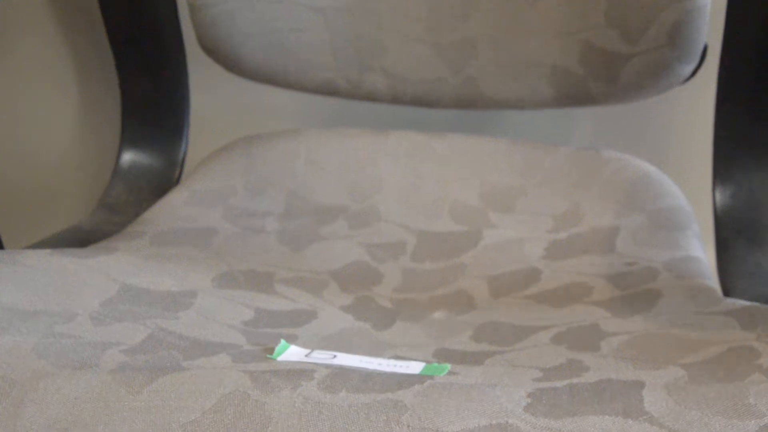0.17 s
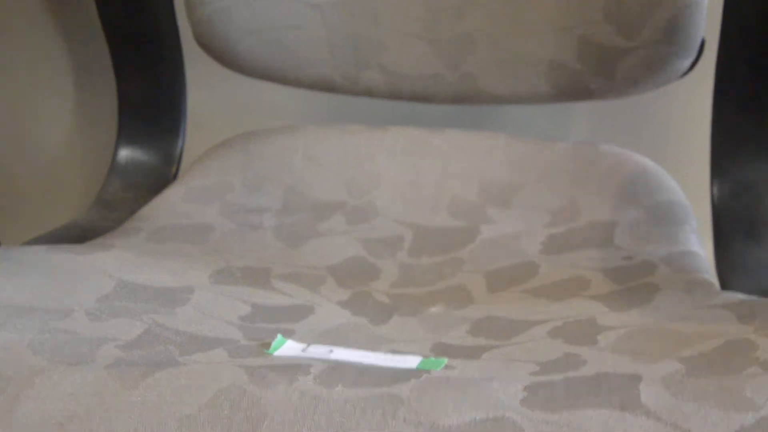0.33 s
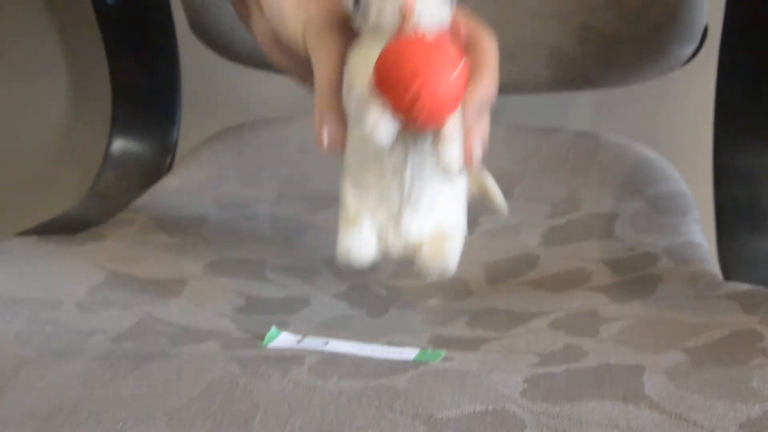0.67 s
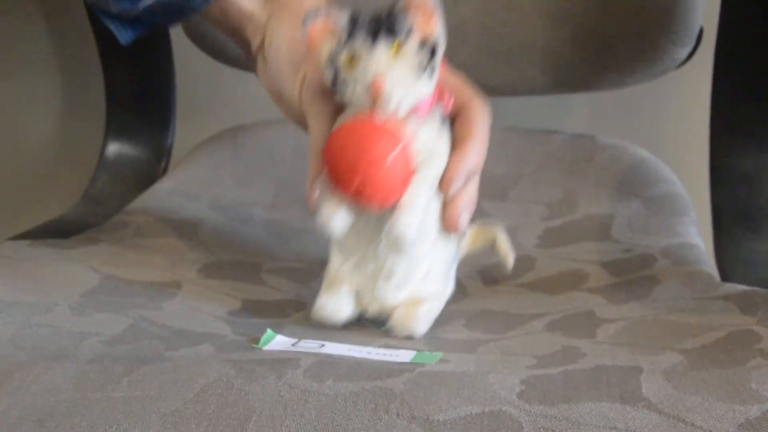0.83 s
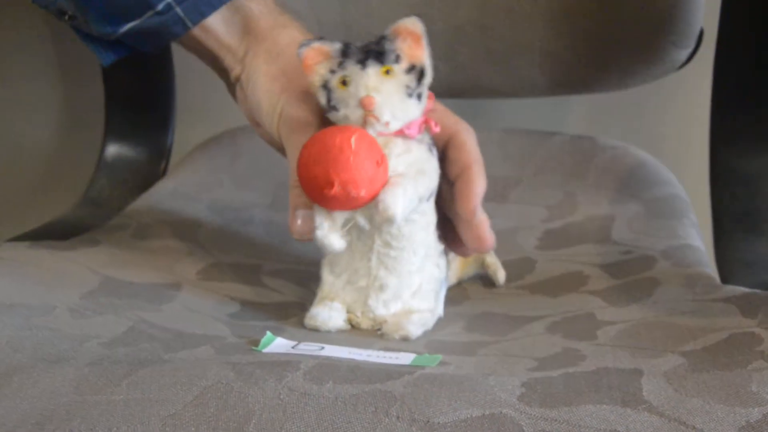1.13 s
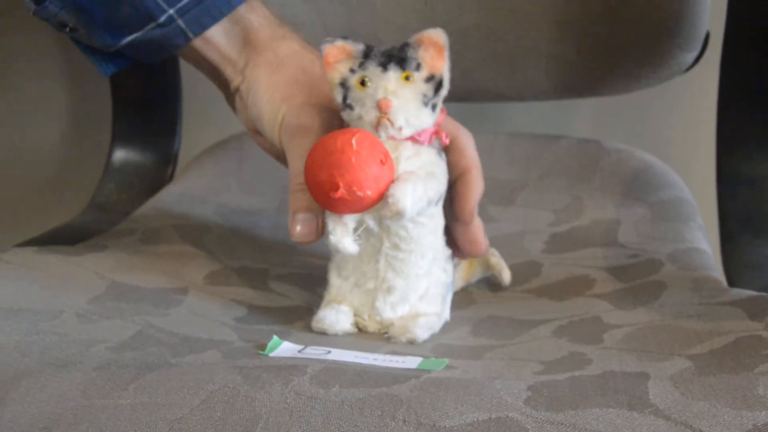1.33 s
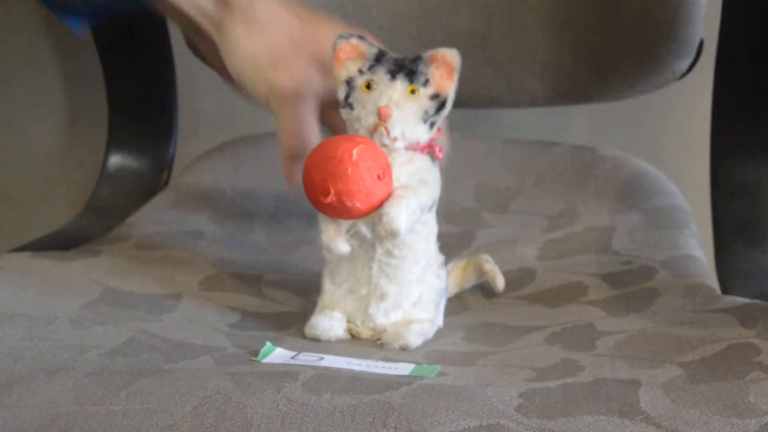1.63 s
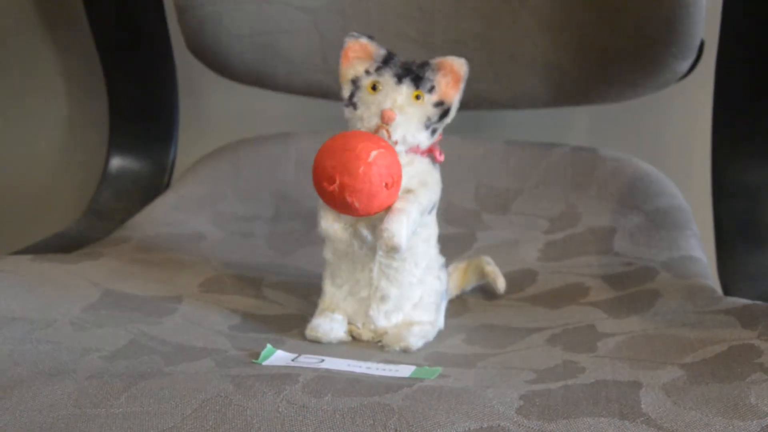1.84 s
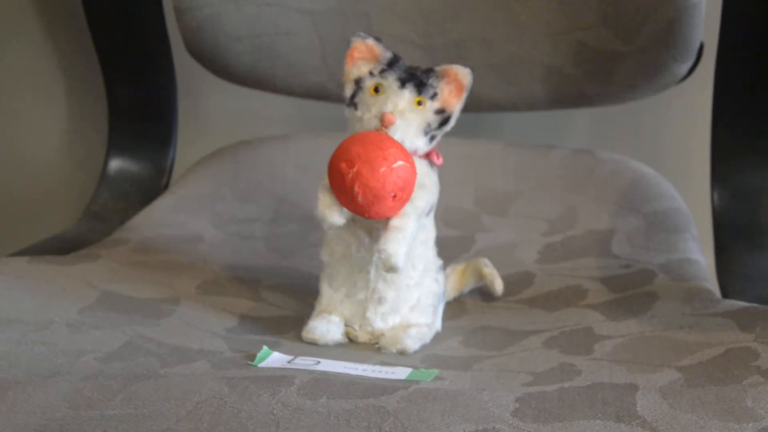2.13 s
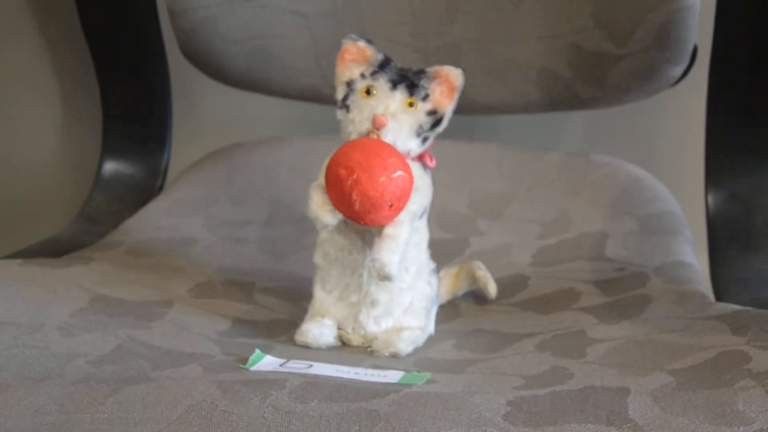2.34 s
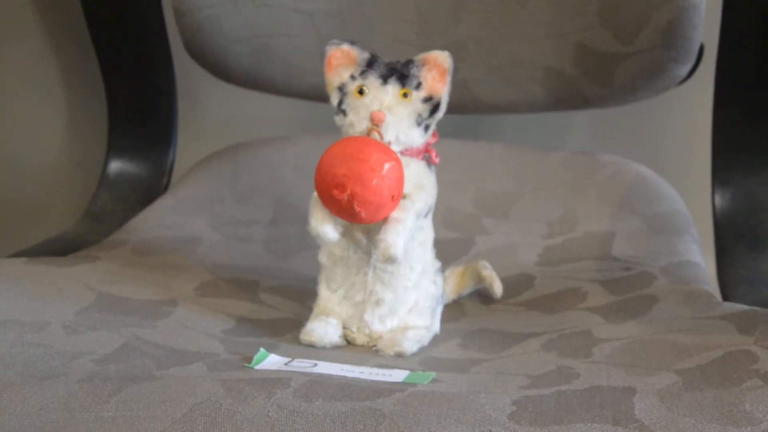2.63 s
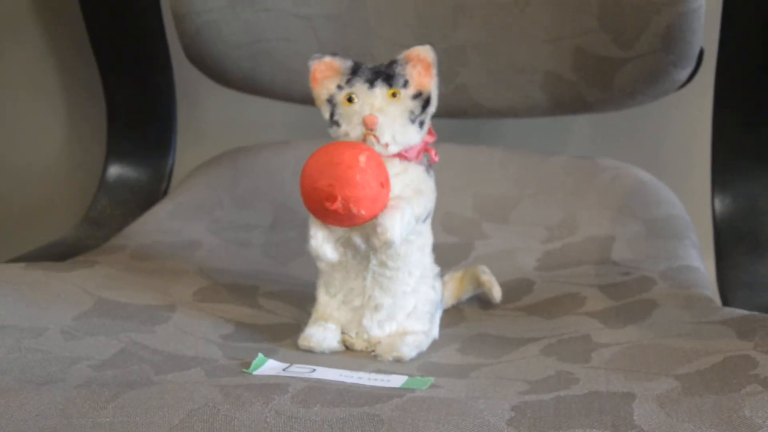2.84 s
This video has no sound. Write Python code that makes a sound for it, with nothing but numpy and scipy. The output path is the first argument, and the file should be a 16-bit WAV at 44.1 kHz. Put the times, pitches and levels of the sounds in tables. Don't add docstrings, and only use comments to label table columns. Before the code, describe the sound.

A wind-up clockwork toy whirs and chatters steadily, with a small bump, in a quiet room.

```python
import sys
import numpy as np
from scipy import signal
from scipy.fft import rfft, irfft, next_fast_len
from scipy.io import wavfile
from scipy.ndimage import uniform_filter1d, map_coordinates

SR = 44100
rng = np.random.default_rng(int(sys.argv[2]) if len(sys.argv) > 2 else 0)


def materialize(psi):
    bounded = np.clip(np.atleast_2d(psi).T, -1, 1)
    quanta = np.round(bounded * 32767).astype(np.int16)
    wavfile.write(sys.argv[1], SR, quanta)


def ratio_of_db(decibels):
    return 10 ** (np.asarray(decibels, float) / 20)


N = 131859
TIME = np.arange(N) / SR

# f/Hz, width/Hz, level/dB
FRAME_TONES = [(1964, 425, -7), (2713, 780, -6.5)]
TIN_TONES = [(3530, 242, 4), (3864, 186, 2)]
UPPER_TIN_TONES = [(4347, 250, 3), (4776, 385, -0.5), (5282, 254, 0)]
PLATE_TONES = [(6050, 640, -8.5), (6500, 580, -5), (7390, 590, -7.5), (8280, 510, -9), (9020, 460, -9.5),
               (10240, 1650, -17.5), (12140, 1240, -24)]


def unit(x):
    return x / np.sqrt(np.mean(x ** 2) + 1e-20)


def wobble(rate):
    points = rng.standard_normal(int(N * rate / SR) + 4)
    return map_coordinates(points, [np.arange(N) * rate / SR])


def filtered(x, response):
    m = next_fast_len(N + SR // 2)
    return irfft(rfft(x, m) * response(np.fft.rfftfreq(m, 1 / SR)), m)[:N]


def ring(x, tones):
    def response(f):
        total = 0
        for k, (center, width, db) in enumerate(tones):
            tone = 1j * f * width / (center ** 2 - f ** 2 + 1j * f * width)
            total = total + (-1) ** k * ratio_of_db(db) * tone
        return total
    return filtered(x, response)


def ticks(per_s, scatter_db):
    chance, size, side = rng.random(N), rng.uniform(-1.3, 1, N), rng.choice([-1, 1], N)
    return (chance < per_s / SR) * side * ratio_of_db(scatter_db * size)


def shaft():
    # t/s, turns done
    turn_times = [(0.0737, 5), (0.0887, 6), (0.1487, 10), (0.2059, 14), (0.2684, 18), (0.3282, 22),
                  (0.3947, 26), (0.4703, 30), (0.5543, 34), (0.6386, 38), (0.7199, 42), (0.8033, 46),
                  (0.8796, 50), (0.9496, 54), (1.0244, 58), (1.0907, 62), (1.1531, 66), (1.2177, 70),
                  (1.2782, 74), (1.339, 78), (1.4072, 82), (1.4753, 86), (1.5389, 90), (1.6056, 94),
                  (1.6819, 98), (1.7591, 102), (1.8464, 106), (1.9558, 110), (2.0362, 114), (2.1158, 118),
                  (2.1908, 122), (2.2576, 126), (2.3164, 130), (2.3748, 134), (2.4325, 138), (2.4873, 142),
                  (2.5447, 146), (2.6063, 150), (2.6715, 154), (2.7386, 158), (2.8065, 162), (2.8708, 166),
                  (2.9335, 170), (2.998, 174)]
    steady = np.interp(TIME, *np.transpose(turn_times))
    speed = np.maximum(np.gradient(steady) * SR, 40)
    return steady + 0.028 * wobble(60), speed


def jolts(turns, level_db):
    # t/s, peak level/dB
    hard_knocks = [(0.2175, -24), (0.3116, -16), (0.4495, -29), (0.5214, -33), (0.531, -17), (0.551, -24),
                   (0.5736, -26), (0.6162, -21), (0.6558, -18), (0.695, -25.5), (0.7164, -32), (0.736, -29),
                   (0.7585, -29), (0.838, -35), (0.856, -28), (0.9853, -23), (1.02, -26), (1.0401, -15),
                   (1.0866, -18), (1.1055, -29), (1.1509, -29), (1.2136, -17), (1.307, -20), (1.3543, -21),
                   (1.456, -21), (1.473, -28), (1.605, -36), (1.6215, -16), (1.737, -17), (1.7766, -18.5),
                   (1.844, -32), (1.8935, -20), (1.9199, -12), (1.9925, -28), (2.0361, -14), (2.075, -22),
                   (2.0945, -27), (2.115, -36), (2.1901, -32), (2.204, -22), (2.284, -24), (2.3148, -27),
                   (2.4585, -26), (2.5892, -35), (2.6186, -30), (2.7038, -20), (2.7219, -21), (2.803, -33),
                   (2.9, -17), (2.9475, -14.5)]
    shake_db, second_share, second_at_turns = 7, 0.45, 0.51
    before_turns, after_turns = 0.15, 0.12
    rise_s, decay_s = 0.00044, 0.0011

    def bump(at):
        away = (turns - at + .5) % 1 - .5
        width = np.where((turns - at) % 1 > .5, before_turns, after_turns)
        return np.exp(-(away / width) ** 2 / 2)

    whole_turn = np.clip(np.round(turns).astype(int), 0, 199)
    luck = rng.uniform(-1.5, 1.5, 200)[whole_turn]
    first = ratio_of_db(0.5 * luck) * bump(0)
    second = second_share * (1 + np.tanh(wobble(30.07))) * bump(second_at_turns)
    jolt_db = shake_db * (first + second) + 0.6 * wobble(14)

    hard_t, hard_db = np.transpose(hard_knocks)[:, :, None]
    lag = np.maximum(TIME - hard_t, 0)
    pulses = np.exp(-lag / decay_s) * (1 - np.exp(-lag / rise_s))
    hard = (ratio_of_db(hard_db - 10.5) * pulses).sum(0)
    return ratio_of_db(9.5) * (unit(ratio_of_db(jolt_db)) * ratio_of_db(level_db) + hard)


def teeth(speed):
    return unit(ticks(60 * speed, 8.5)) + ratio_of_db(-7.5) * rng.standard_normal(N)


def sharp_teeth():
    # t/s, peak level/dB
    strikes = [(0.1734, -16), (0.2354, -21), (0.2654, -22), (0.3604, -21), (0.4684, -19), (1.2146, -27),
               (1.2774, -22), (1.2914, -17), (1.3234, -26), (1.3714, -17), (1.4944, -18), (1.5384, -20),
               (1.5544, -18), (1.9434, -17), (2.0044, -26), (2.0434, -18.5), (2.2404, -17), (2.2564, -19),
               (2.2994, -23), (2.3304, -19), (2.3454, -19), (2.3584, -24), (2.3874, -29), (2.4304, -19),
               (2.4724, -23), (2.4864, -19), (2.7374, -19), (2.8854, -21), (2.9314, -19)]
    places = [round(s * SR) for s, _ in strikes]
    sizes = ratio_of_db([db + 14.5 for _, db in strikes])
    return np.bincount(places, sizes * rng.choice([-1, 1], len(strikes)), N)


def clockwork():
    # t/s, level/dB, plates/dB, hollow body/dB, frame/dB, upper tin/dB
    spring = [(.07, -35.5, 6, -1, 3, 2.5), (.19, -37.5, 4.5, -3, 2.5, 1.5), (.31, -34.5, 4.5, -2.5, 1, 3.5),
              (.42, -38.5, 4.5, -1.5, 0.5, -0.5), (.56, -41, 1, 0, -1.5, -2), (.72, -44.5, 6, 3, 3.5, 2),
              (.9, -40, 4, -2, 2.5, 2), (1.0, -40, 1.5, 1.5, -0.5, 0.5), (1.1, -36.5, 0, 1, 1, 0),
              (1.3, -35.5, 0, 1.5, 0, -2.5), (1.55, -38, 1.5, 2, 0.5, 1),
              (1.76, -39.5, 0.5, 1.5, -0.5, -1.5), (1.89, -43, 0, 0.5, 1, 1), (2.082, -38, -1, 1, -2, 0.5),
              (2.17, -38.5, 1.5, 0.5, 1, 0.5), (2.25, -32.5, -4.5, -2, -1.5, -1),
              (2.33, -33, -2.5, -1.5, -2, -1), (2.39, -34.5, 1, 1.5, 1, -1), (2.47, -33, 0.5, 0.5, 0, 1),
              (2.58, -35.5, 0.5, 1.5, 0, -1.5), (2.64, -35.5, -1, 1, 2, -1), (2.75, -37, 1, 3, 0, 1.5),
              (2.99, -36, 0, 1.5, 1, -0.5)]
    # f/Hz, width/Hz, level/dB
    body_tones = [(366, 26, -20.5), (557, 37, -8), (627, 250, -9), (864, 180, -5), (1037, 70, -6),
                  (1630, 1200, -15.5)]
    # f/Hz, width/Hz, level/dB
    underside_tones = [(467, 130, -6), (1660, 240, -11.5), (2900, 290, -16), (4520, 280, -2.5),
                       (5660, 320, -17), (6570, 250, -5), (7460, 230, -1.5), (10350, 710, -10),
                       (11600, 1000, -3.5), (11900, 600, -6.5)]
    # f/Hz, width/Hz, level/dB
    tipped_tones = [(268, 84, -13), (1055, 71, -3.5), (3670, 150, -17), (4400, 220, -11), (6220, 350, -14),
                    (7940, 410, -2), (9100, 340, -10.5), (11000, 640, -23)]
    held_until_s, turn_away_s = 0.24, 0.041
    tipped_s, tipped_half_s = 0.34, 0.11

    s, *columns = np.transpose(spring)
    level_db, plates_db, hollow_db, frame_db, upper_db = [np.interp(TIME, s, c) for c in columns]
    turns, speed = shaft()
    shake = jolts(turns, level_db)
    shared = teeth(speed)
    crowding = np.abs(uniform_filter1d(shared ** 2, size=90))
    shared = unit(shared / np.sqrt(crowding + 0.11))
    strikes = sharp_teeth()

    def drive():
        return unit(shared + 0.7 * teeth(speed)) * shake + strikes

    facing = (1 - np.tanh((TIME - held_until_s) / turn_away_s)) / 2
    tipped = ratio_of_db(1.5) * np.exp(-((TIME - tipped_s) / tipped_half_s) ** 2)
    metal = drive()
    sound = ring(metal * ratio_of_db(frame_db), FRAME_TONES)
    sound += ring(metal, TIN_TONES)
    sound += ring(metal * ratio_of_db(upper_db), UPPER_TIN_TONES)
    sound += ring(drive() * facing, underside_tones)
    sound += ring(drive() * tipped, tipped_tones)
    sound += ring(drive() * ratio_of_db(plates_db), PLATE_TONES)
    return sound + ring(drive() * ratio_of_db(hollow_db), body_tones)


def cam():
    # t/s, level/dB, rattle length/s, tin over body/dB
    bumps = [
        (1.918, -22, 0.038, -2),
        (2.656, -33, 0.027, 3),
    ]
    # f/Hz, width/Hz, level/dB
    knock_tones = [(304, 110, -2), (562, 90, 2.5), (780, 160, 0), (1230, 550, -10.5), (1760, 290, -16)]
    blows, body, tin = np.zeros((3, N))
    for s, db, length, tin_db in bumps:
        blows[round((s + .0003) * SR)] = -ratio_of_db(db + 31)
        fade = (TIME > s) / (1 + (np.maximum(TIME - s, 0) / length) ** 4)
        shake = ratio_of_db(db + 1) * fade
        body += shake
        tin += shake * ratio_of_db(tin_db - 3)
    rattle = unit(ticks(2500, 4.3))
    crack = ratio_of_db(-16) * blows
    metal_tones = FRAME_TONES + TIN_TONES + UPPER_TIN_TONES + PLATE_TONES
    return ring(blows + body * rattle, knock_tones) + ring(tin * rattle + crack, metal_tones)


def sway(x):
    _, _, z = signal.stft(x, SR, nperseg=256)
    field = rng.standard_normal(z.shape)
    for _ in range(2):
        field = uniform_filter1d(uniform_filter1d(field, size=4, axis=0), size=30, axis=1)
    return signal.istft(z * ratio_of_db(0.5 * unit(field)), SR, nperseg=256)[1][:N]


def fur(x):
    soft_hz = 11300
    return filtered(x, lambda f: 1 / (1 - (f / soft_hz) ** 2 + 1.2j * f / soft_hz) ** 3)


def room(x):
    t60_s = 0.092
    t, turn = np.arange(SR // 3) / SR, np.pi * TIME
    tails = rng.standard_normal((4, len(t))) * ratio_of_db(-60 * t / t60_s) * (t > .003)
    shares = np.array([np.cos(turn), np.sin(turn), np.cos(3 * turn), np.sin(3 * turn)]) / np.sqrt(2)
    return signal.fftconvolve(x * shares, tails / np.linalg.norm(tails[0]), axes=1).sum(0)[:N]


def room_tone():
    # f/Hz, level/dB per Hz
    air_color = [(20, -10), (60, -2), (150, -2), (300, 5), (800, -4), (2000, -1), (6000, -77), (15700, -60)]
    # t/s, rise over rest/dB, half length/s
    swells = [
        (0.192, 12.5, 0.049),
        (0.574, 7, 0.026),
        (0.702, 6.5, 0.075),
        (1.064, 11, 0.13),
        (1.848, 5, 0.17),
        (2.65, 6.5, 0.069),
        (2.885, 4.5, .06),
    ]
    hum_hz, whistle_hz = 217.5, 15691
    f, db = np.transpose(air_color)
    air = unit(filtered(rng.standard_normal(N), lambda hz: ratio_of_db(np.interp(np.log(hz + 1), np.log(f), db))))

    rough = ring(rng.standard_normal(N), [(hum_hz, 28, 0)])
    rough = unit(ring(rough, [(hum_hz, 60, 0)]))
    steady = np.sin(2 * np.pi * hum_hz * TIME + 1.43 * wobble(18))
    hum = unit(rough / 2 + ratio_of_db(-0.5) * steady)
    swell_db = sum(rise * np.exp(-((TIME - s) / half) ** 2) for s, rise, half in swells)

    whistle = np.sqrt(2) * np.sin(2 * np.pi * whistle_hz * TIME + .1 * wobble(20))
    hiss = rng.standard_normal(N)
    return ratio_of_db(-55.5) * air + ratio_of_db(-64.5 + swell_db) * hum + ratio_of_db(-67.5) * hiss + ratio_of_db(-68.5) * whistle


def scene():
    toy = fur(sway(clockwork()) + cam())
    return (toy + ratio_of_db(-12.5) * room(toy) + room_tone())[None]


def roll_off(x):
    return signal.sosfilt(signal.butter(12, 15750, fs=SR, output="sos"), x)


def record(dry):
    dip_centers = [5710, 6900, 14990]
    # width/Hz, gain left (1 = all)
    dip_shapes = [(310, 0.41), (107, 0.17), (300, .02)]
    start_s, top_hz = 0.073, 15750

    def microphone(f):
        gain = f < top_hz
        for center, (width, left) in zip(dip_centers, dip_shapes):
            away, spread = center ** 2 - f ** 2, 1j * f * width
            gain = gain * (away + spread * left) / (away + spread)
        return gain

    mix = filtered(dry[0] * (TIME > start_s), microphone)
    return roll_off(mix[None])


dry = scene()
out = record(dry)
materialize(out)
```